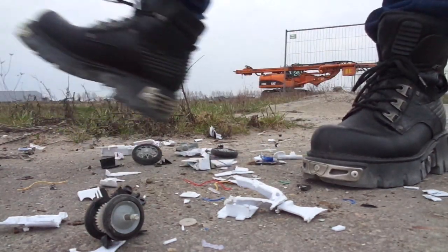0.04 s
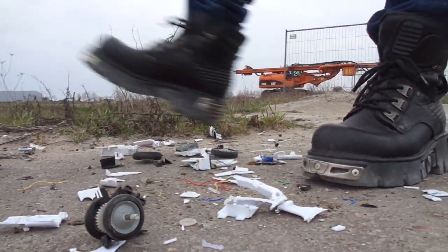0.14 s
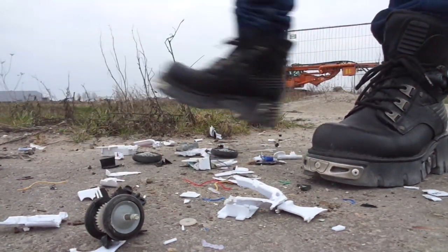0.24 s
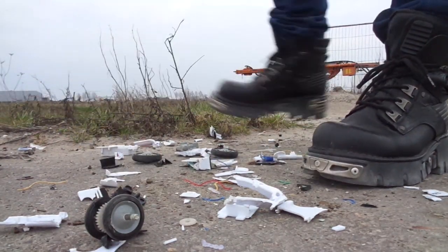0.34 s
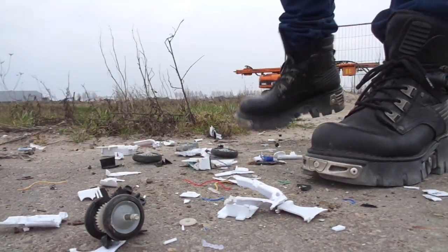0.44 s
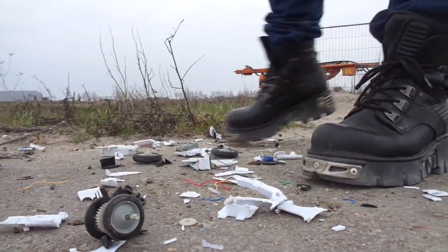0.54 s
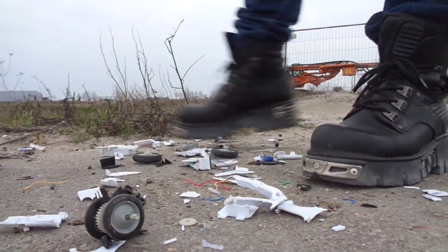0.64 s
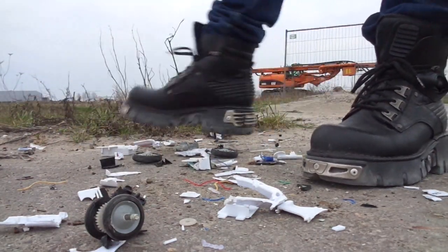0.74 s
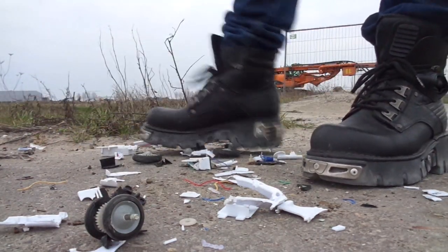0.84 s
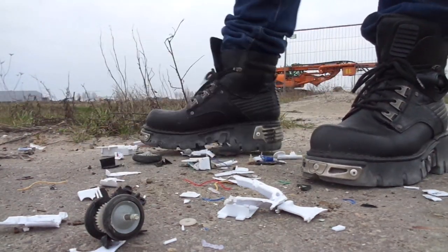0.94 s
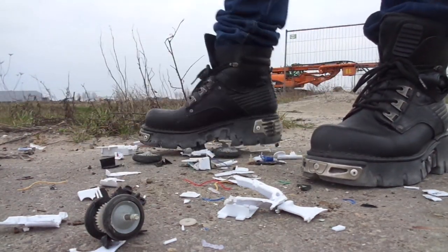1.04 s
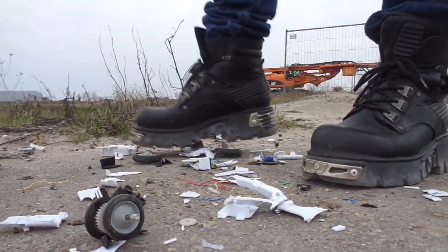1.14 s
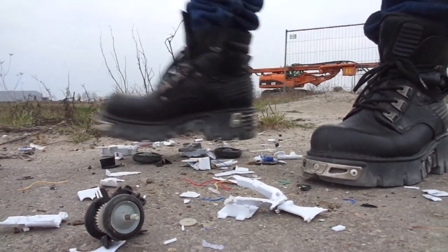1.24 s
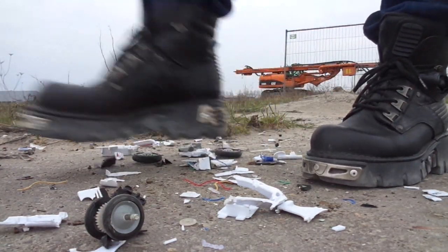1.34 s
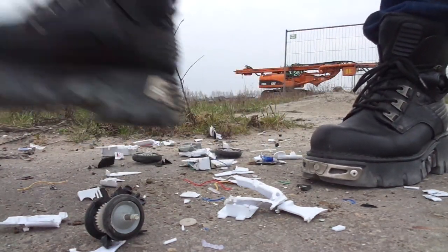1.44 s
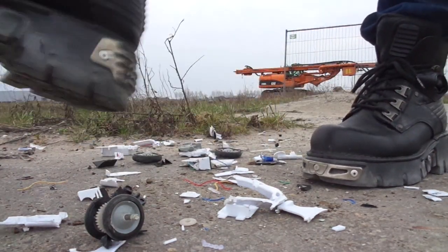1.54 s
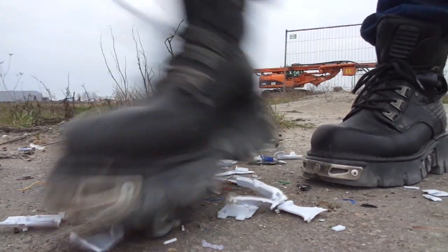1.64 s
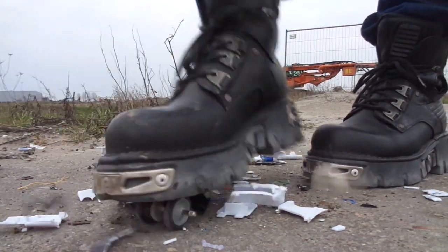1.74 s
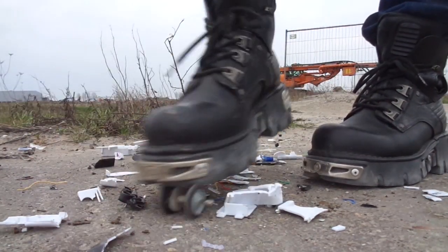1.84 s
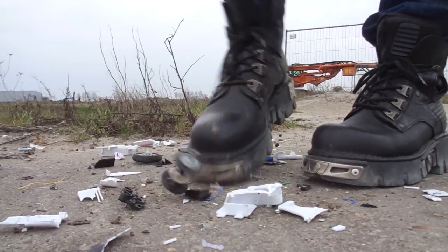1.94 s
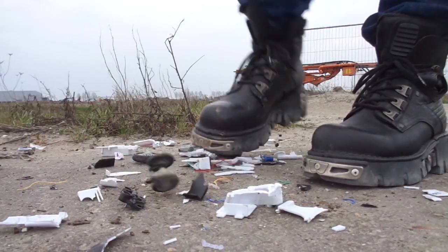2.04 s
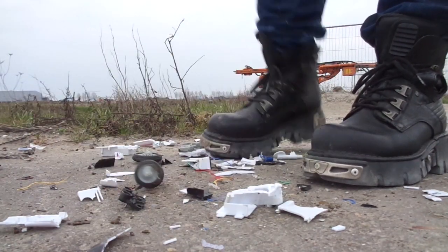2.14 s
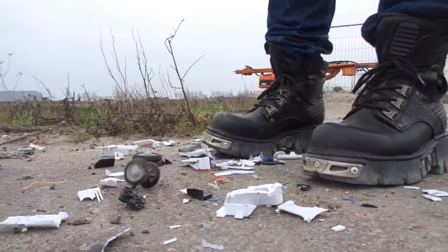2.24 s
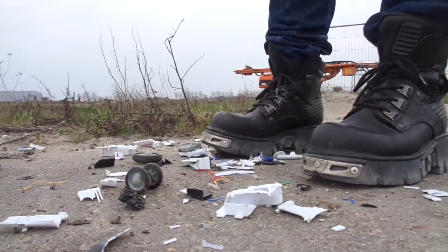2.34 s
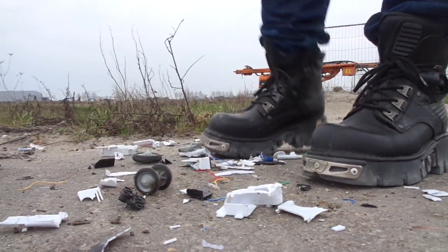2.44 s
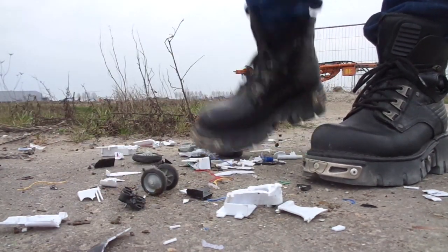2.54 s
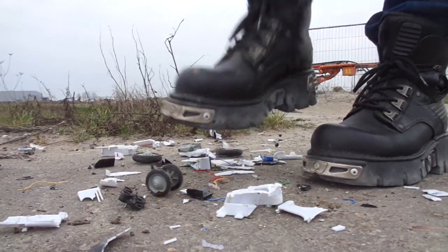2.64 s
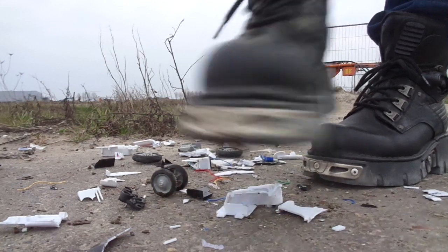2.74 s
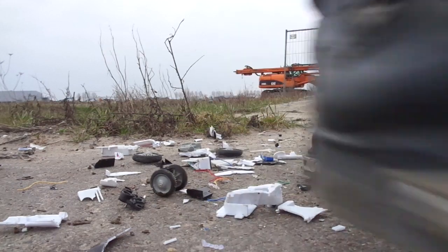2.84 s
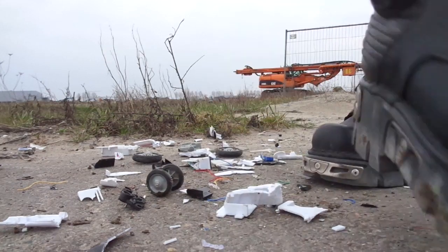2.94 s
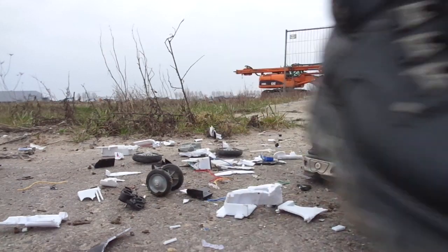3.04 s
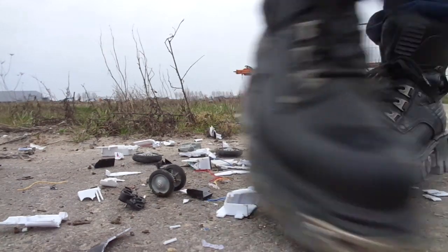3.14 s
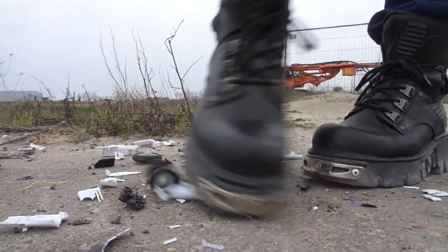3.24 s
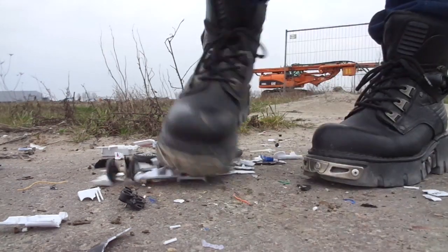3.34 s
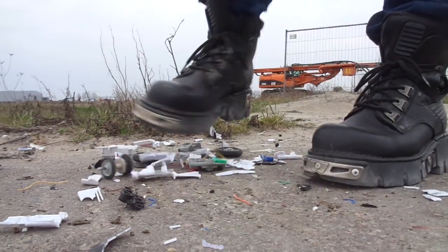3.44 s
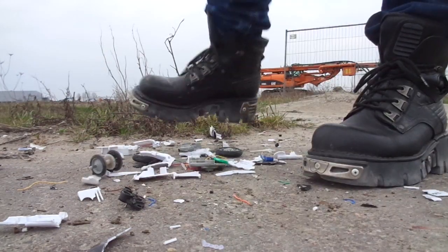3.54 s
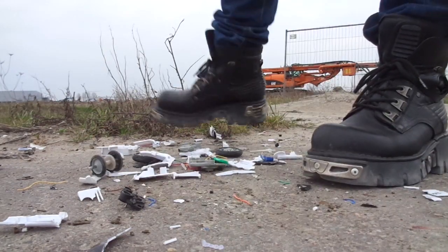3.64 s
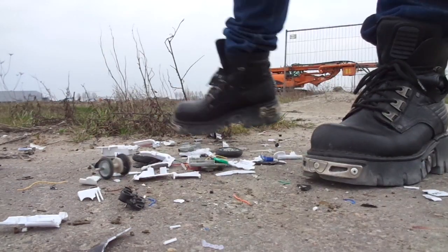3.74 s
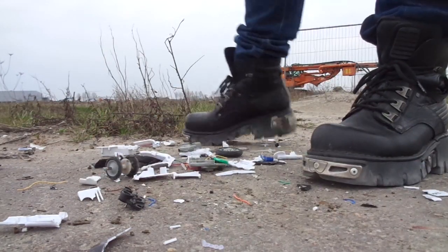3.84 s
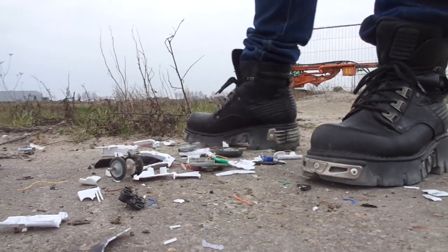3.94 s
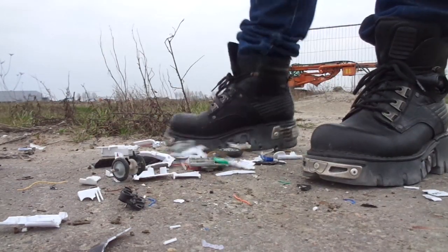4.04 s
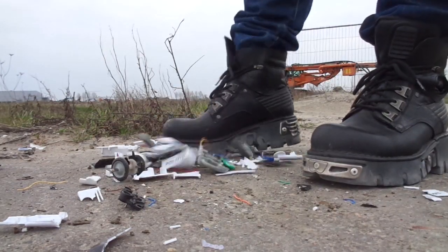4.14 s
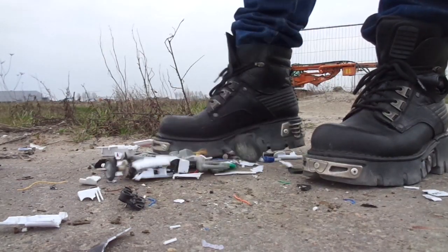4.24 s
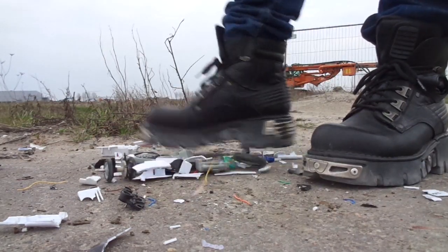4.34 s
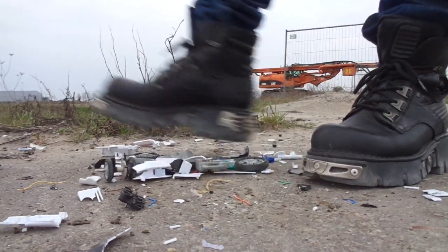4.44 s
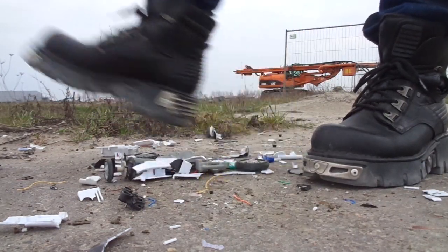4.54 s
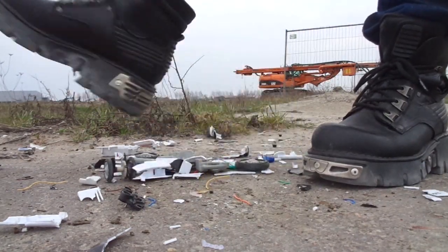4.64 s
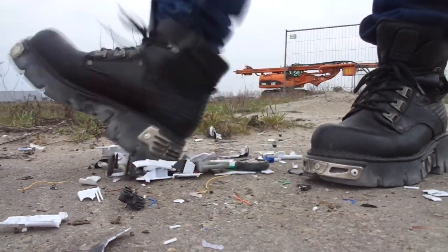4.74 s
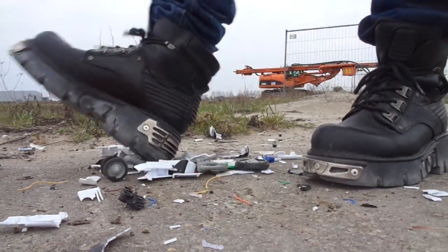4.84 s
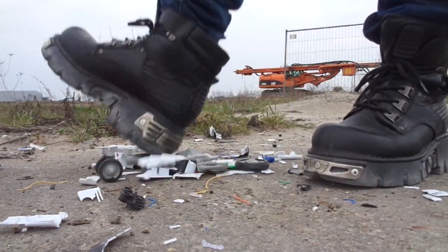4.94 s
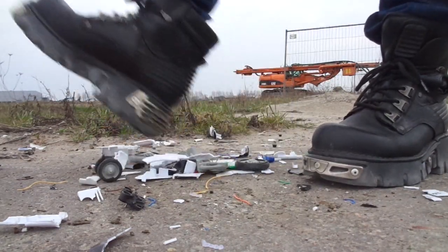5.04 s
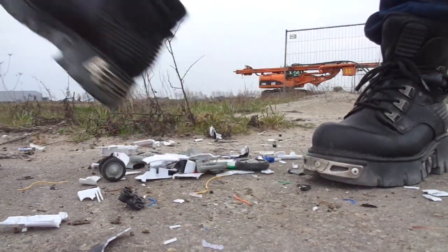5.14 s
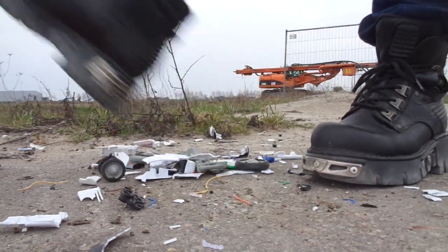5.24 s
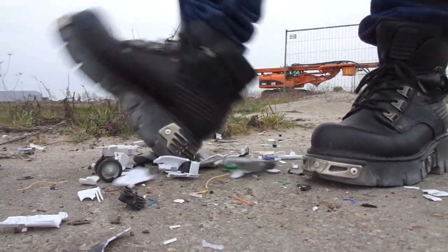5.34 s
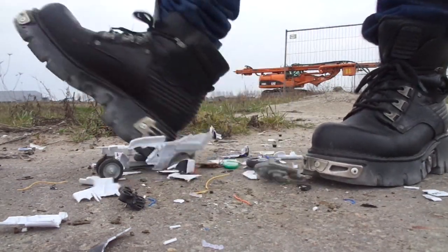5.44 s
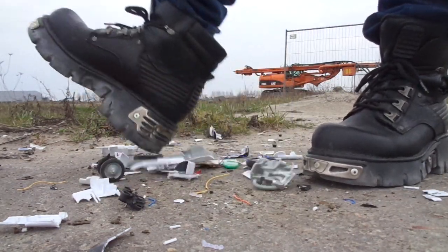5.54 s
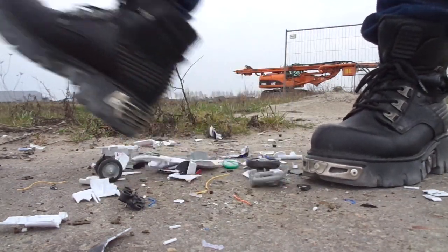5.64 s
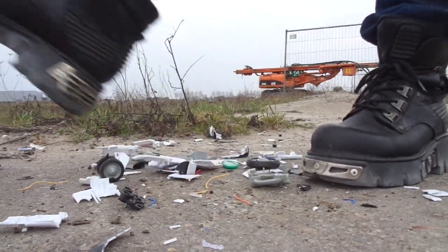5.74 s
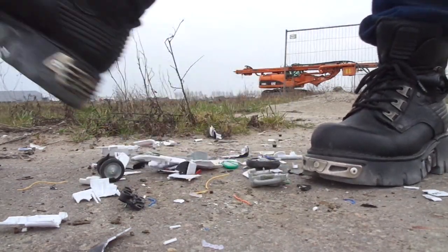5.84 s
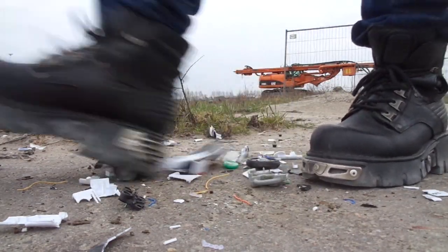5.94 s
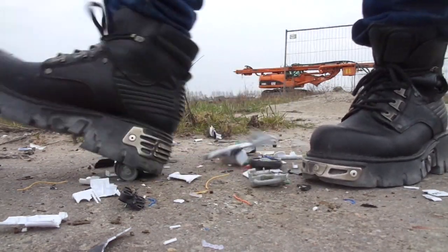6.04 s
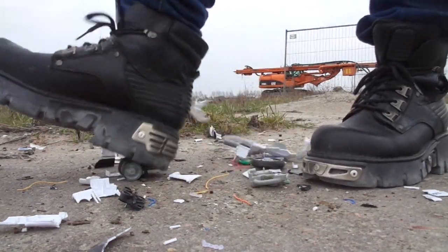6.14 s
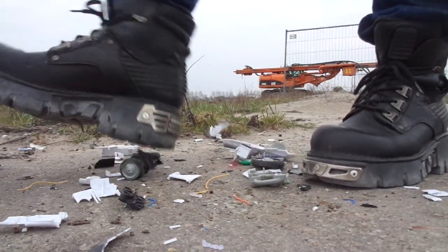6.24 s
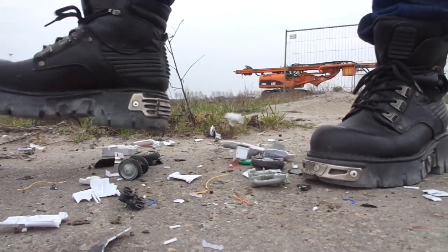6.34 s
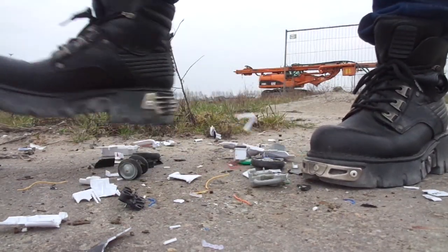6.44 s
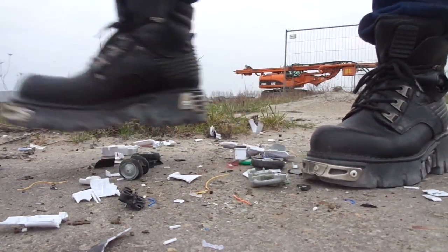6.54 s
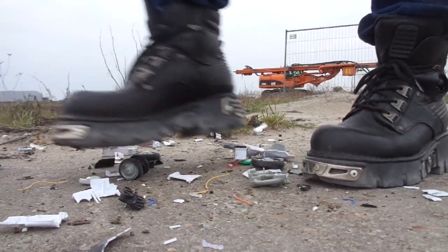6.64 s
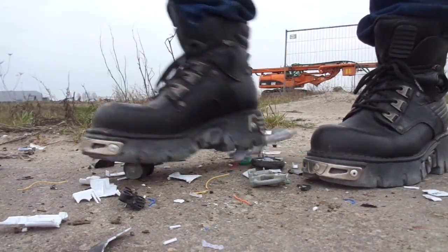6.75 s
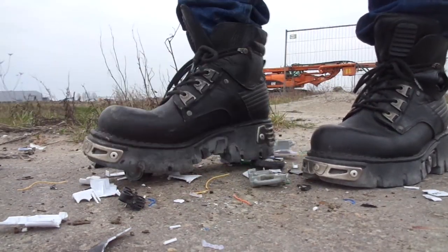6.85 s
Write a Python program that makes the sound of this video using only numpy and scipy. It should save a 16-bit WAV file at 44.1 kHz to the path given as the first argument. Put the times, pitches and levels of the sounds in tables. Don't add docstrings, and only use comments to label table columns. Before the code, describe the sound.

A heavy boot stamps brittle plastic on gritty pavement: sharp overloaded cracks, clattering shards and scraping drags, while a distant machine's roar recedes.

```python
import sys
import numpy as np
from scipy import signal
from scipy.fft import rfft, irfft
from scipy.io import wavfile
from scipy.ndimage import uniform_filter1d

SR = 44100
rng = np.random.default_rng(int(sys.argv[2]) if len(sys.argv) > 2 else 0)


def undo_db(level):
    steps = np.asarray(level, float) / 20
    return 10 ** steps


def output_pcm(signal):
    pcm = np.clip(np.atleast_2d(signal).T, -1, 1) * 32767
    wavfile.write(sys.argv[1], SR, np.round(pcm).astype(np.int16))


N = 303849

# (time [s], roar level [dB], whine level [dB])
MACHINE = [(0, -28.5, -65), (.2, -39, -45), (.5, -30, -52), (.65, -30.5, -45), (.8, -31, -39.5),
           (.95, -41, -44.5), (1.22, -30.5, -52), (1.35, -31, -49), (1.5, -45, -40.5), (1.62, -43, -41.5),
           (2.05, -47.5, -46), (2.9, -52, -45), (3.62, -54.5, -50.5), (3.8, -51.5, -45), (4.5, -55, -58.5),
           (5.2, -62, -61), (6.5, -64, -61.5), (6.89, -49, -67)]
# (frequency [Hz], density [dB per Hz])
ROAR_SPECTRUM = [(150, -45), (270, -20.5), (570, -2.5), (900, 2), (1400, -7), (2100, -11.5), (2900, -32.5),
                 (5000, -67.5)]
# (multiple of its pitch, width [Hz], level [dB])
WHINE_PARTIALS = [(1, 40, -15.5), (2, 150, -8.5), (3, 85, -2.5)]
# (frequency [Hz], density [dB per Hz])
WIND_SPECTRUM = [(15, -21), (30, -10.5), (55, 3.5), (110, -3.5), (200, -15.5), (400, -39.5)]
# (peak time [s], level [dB])
GUSTS = [(.45, -59), (.8, -56.5), (1.4, -53.5), (1.8, -43.5), (2.6, -59), (3.051, -59), (3.6, -57.5),
         (4.05, -53.5), (4.8, -53), (5.2, -55.5), (6.001, -60), (6.8, -56)]
# (frequency [Hz], density [dB per Hz])
HISS_SPECTRUM = [(150, 8), (400, 15), (1100, 18.5), (2200, 11.5), (2900, 3), (6000, -3), (14000, -4),
                 (16000, -11)]
# (time [s], peak level [dB], frequency [Hz], t60 [s])
THUDS = [(0.783, -29.5, 124, 0.1), (0.85, -15, 513, 0.05), (1.659, -10.5, 275, 0.045),
         (1.763, -37, 169, 0.053), (1.785, -25.5, 136, 0.084), (1.907, -27, 160, 0.05),
         (2.139, -34.5, 256, 0.04), (3.973, -36, 369, 0.04), (4.765, -15, 219, 0.029),
         (5.338, -21, 439, 0.057), (5.44, -51.5, 410, 0.087), (5.964, -8.5, 317, 0.02),
         (6.728, -24, 399, 0.03)]
# (time [s], level [dB])
SHELL = [(3.02, -63), (3.05, -23), (3.12, -29.5), (3.16, -43), (3.27, -38.5), (3.34, -66)]
# (frequency [Hz], width [Hz], level [dB])
PIECE_RINGS = [(1320, 280, 3), (2920, 280, 9.5), (4900, 460, 8.5), (6300, 280, 3.5)]
# (time [s], level [dB])
PIECE_HELD = [(3.125, -25), (3.165, -31), (3.21, -21.5), (3.29, -22), (3.33, -35.5), (3.365, -20.5),
              (3.39, -39), (3.44, -42), (3.52, -45)]
# (time [s], peak
# level [dB], ring [Hz], t60 [ms])
KNOCKS = [(3.023, -12, 4900, 12), (3.0506, -2.5, 2510, 18), (3.0564, -15, 2620, 12), (3.0638, -6, 2560, 13),
          (3.0689, -0.5, 2700, 9.8), (3.0914, -9, 2770, 12), (3.0974, -5, 2400, 8.9),
          (3.1034, -4.5, 2370, 9), (3.1204, -14, 4970, 18), (3.141, -10, 5440, 36), (3.1697, -10, 4880, 38),
          (3.1838, -14, 2900, 15), (3.21, -10, 3020, 18), (3.2323, -23, 2930, 19), (3.2484, -18, 5200, 18),
          (3.265, -10, 6260, 20), (3.276, -7, 5770, 23), (3.3, -21, 2920, 21), (3.36, -10, 4660, 40),
          (3.367, -10, 2920, 17), (3.403, -19, 4800, 43), (3.425, -17, 4480, 47), (3.462, -24, 7300, 20),
          (3.504, -22, 6800, 29), (4.066, -13.5, 3630, 23), (4.0896, -18, 2600, 24), (4.128, -16, 2540, 28),
          (4.1654, -19, 3320, 18), (4.197, -17, 3390, 31), (4.2073, -18, 1390, 36), (4.222, -20, 1380, 82),
          (4.236, -21, 3070, 12), (4.2493, -16, 5050, 12), (4.275, -18, 2190, 9.1), (4.297, -25, 2710, 12),
          (4.36, -31, 7000, 12), (4.4144, -30.5, 1210, 18), (6.017, -20, 2850, 19), (6.0557, -19, 3770, 18),
          (6.0744, -26, 5250, 18), (6.146, -30, 2220, 20), (6.2, -24, 1180, 18), (6.2174, -27, 7430, 35),
          (6.281, -30, 7460, 8), (2.1417, -27, 1500, 7), (4.887, -22, 3030, 14), (5.361, -41.5, 7700, 15),
          (5.374, -30, 1200, 110), (5.4105, -16, 6380, 22), (5.4205, -22, 4800, 14), (5.47, -19, 1300, 25),
           (5.535, -25, 2950, 110), (5.5562, -26, 1370, 80), (5.559, -27, 5300, 50), (5.566, -25, 3750, 50),
           (5.579, -20, 5000, 15), (5.606, -25, 4900, 70), (5.6484, -30, 4450, 8), (5.6595, -25, 3970, 25),
           (5.672, -26, 3700, 50), (5.696, -34, 4500, 25), (5.722, -36, 4200, 25), (6.036, -25, 2100, 90),
           (6.258, -34, 2800, 90), (6.761, -17, 1700, 18), (6.771, -24, 6300, 8), (6.783, -20, 2050, 70),
           (6.785, -19, 4700, 35), (6.802, -20, 4400, 40), (6.802, -23, 2050, 30), (6.822, -28, 2050, 100),
           (6.837, -23, 3850, 45), (4.763, -6, 6700, 18), (.05, -31, 6500, 20), (.084, -31, 3900, 40),
           (.131, -19, 7500, 14), (.134, -25, 3200, 12), (.214, -33, 3200, 10), (.288, -34, 3800, 12),
           (1.68, -5, 1000, 12), (1.712, -22, 7000, 8), (1.7022, 2, 1300, 4), (5.988, -11, 1050, 8),
           (2.1688, -5, 1550, 2), (5.535, -25, 3260, 100), (1.9215, -21, 10300, 5)]
# (time [s], peak level [dB], ring [Hz])
GRAINS = [(0.9194, -33, 2910), (0.9777, -35, 3360), (1.1258, -44, 4440), (1.152, -33, 2790),
          (1.191, -35, 3130), (1.2414, -35, 3050), (0.34, -38, 3330), (1.457, -30.5, 6300),
          (6.725, -34, 4500), (1.922, -24, 6460), (1.7744, -26, 4150), (1.822, -39, 3780),
          (1.8654, -36, 7060), (1.8927, -30, 9000), (2.0294, -33, 4230), (2.0981, -31, 3930),
          (2.1224, -26, 3030), (2.156, -21, 1900), (2.225, -47, 3570), (2.3176, -34, 2950),
          (2.601, -38, 3460), (3.8794, -41.5, 3120), (2.136, -30, 6800), (4.3894, -31, 6110),
          (4.4894, -36, 4560), (4.8569, -29, 2910), (4.9094, -37, 5040), (5.039, -28, 3880),
          (6.3864, -33, 7200)]
# (time [s], level [dB], mid share [dB])
DRAGS = [
    [(3.01, -32, -5), (3.05, -26.5, -2), (3.1, -22, -3.5), (3.162, -31, -8), (3.2, -34, 6),
     (3.28, -18.5, -8.5), (3.335, -25, -17), (3.365, -27.5, -8), (3.39, -48, -14)],
    [(4.06, -24.5, -1.5), (4.1, -32, -10.5), (4.2, -25, -10.5), (4.28, -30.5, -18), (4.36, -41, -18),
     (4.45, -61, 11)],
]
# (peak time [s], level [dB], rise [dB/s], fall [dB/s], mid share [dB])
SPRAYS = [(.125, -43, 120, 300, 1), (0.868, -48.5, 1997, 387, 20), (1.2, -59.5, 47, 150.5, 14),
          (1.669, -26.5, 1990, 347, 4.5), (1.722, -32, 148, 1500, -4.5), (1.85, -59.5, 97, 38.5, 19),
          (2.15, -61.5, 78, 198, 1), (3.43, -31.5, 198, 178, -4), (3.981, -54, 248, 251.5, 11),
          (4.786, -44.5, 1999.5, 654.5, 7.5), (4.87, -38.5, 167.5, 192.5, -4.5), (5.05, -51, 60, 400, 3),
          (5.35, -51.5, 2000.5, 236, 4.5), (5.451, -26, 434.5, 349.5, -4.5), (5.59, -37, 65, 148, -9.5),
          (5.719, -52, 67, 606.5, -7.5), (5.989, -35, 2003.5, 334, -1), (6.045, -28.5, 67.5, 250, -10),
          (6.14, -43.5, 78, 165, -5), (6.27, -51.5, 48, 74, 3), (6.77, -52, 664.5, 191, 13),
          (6.82, -27, 214, 364, -29)]
# (time [s], five rings [Hz])
SHARDS = [
    (0, 2620, 3100, 3680, 5140, 6560),
    (1.6, 940, 2650, 3680, 5360, 6860),
    (3.0, 2510, 2720, 2750, 4620, 5000),
    (3.12, 2770, 3280, 4540, 5030, 6280),
    (3.9, 1280, 2710, 3340, 4100, 4880),
    (4.7, 1930, 2520, 2940, 4600, 6840),
    (5.3, 1160, 3020, 3870, 4830, 4810),
    (5.9, 1990, 2800, 3140, 3890, 5460),
    (6.6, 1550, 2070, 3840, 4200, 5260),
]
# (frequency [Hz], density [dB per Hz])
PLASTIC_SPECTRUM = [(800, -44.5), (1600, 2), (2600, -0.5), (4500, -5), (6800, -1.5), (9000, -9.5),
                    (13000, -18.5), (16000, -13.5)]
# (time [s], peak level [dB], shard ring [Hz], tearing time [ms], body minus peak [dB])
STAMPS = [(0.8536, 5, 2490, 2.2, -7), (0.8589, -2, 2820, 3.6, -7), (0.878, -22, 6500, 4.5, 5),
          (1.6636, 1, 7230, 1.44, -10), (1.6611, -10.5, 2280, 6.4, 0), (1.674, -25, 1880, 0.97, 20),
          (1.6853, -8.5, 8300, 0.98, -2), (1.7018, -4.5, 2600, 0.6, -3.5), (2.143, -30, 1940, 14, 6),
          (3.972, -42, 2930, 19, 17), (4.7612, 0.5, 3000, 4.1, -11.5), (4.77, 5, 5960, 2.1, -24.5),
          (4.774, -6, 3500, 1.8, -11.5), (4.7822, -10.5, 6000, 1.7, -6), (5.33, 5, 2520, 1.9, -10.5),
          (5.334, 5, 3430, 8.3, -12), (5.475, -21, 3530, 3.2, -0.5), (5.9514, 3, 6700, 0.38, -18),
          (5.96, -13.5, 7500, 1.5, -3), (5.9661, -5, 3580, 8.9, -4.5), (5.9799, -3.5, 4260, 4.2, -37),
          (5.9853, -9, 4970, 11.3, -5.5), (6.7516, -22, 4030, 3, -4.5), (6.7823, -11.5, 4500, 3.4, -14),
          (6.801, -19.5, 6800, 1.8, -4.5), (6.81, -27, 6550, 7.8, -13)]
# (time [s], peak level [dB], shard ring [Hz], tearing time [ms])
SNAPS = [(3.0032, -15, 2820, 2.2), (3.026, -17.5, 2920, 2.2), (3.0331, -18, 5960, 1.4),
         (3.039, -6.5, 2830, 5), (3.0685, -15.5, 2580, 2.3), (3.0806, -8.5, 2430, 3.1),
         (3.104, -14, 2430, 2.5), (3.1286, -9.5, 4700, 0.66), (3.14, -19, 4930, 3.9),
         (3.1695, -29, 4900, 1.6), (3.189, -7.5, 4310, 3.9), (3.211, -25, 2840, 1.2),
         (3.309, -10, 3370, 6.8), (3.344, -4.5, 3640, 0.57), (3.357, -23, 4700, 0.61),
         (3.3786, -32, 3440, 1.5), (3.4018, -16, 4460, 3.6), (3.4253, -25, 4460, 6.6),
         (3.493, -29, 6150, 1.9), (3.537, -32, 7700, 2.1), (4.056, -17.5, 3060, 12.6),
         (4.075, -17.5, 5600, 1.5), (4.112, -17.5, 4140, 3.2), (4.117, -9, 4300, 1.3),
         (4.122, -20, 2630, 9.8), (4.148, -19, 3650, 1.7), (4.1703, -21.5, 3800, 6.2),
         (4.252, -22, 2730, 10), (4.2665, -22, 4600, 10), (4.3166, -28.5, 4700, 1), (4.3288, -30, 2920, 1)]
# (time [s], peak level [dB], shard ring [Hz], skid [ms])
LANDINGS = [(4.823, -29, 2780, 1.4), (4.884, -31, 3020, 2.2), (4.953, -30.5, 6160, 6.3),
            (4.968, -25, 2750, 0.81), (5.053, -32, 3680, 5.2), (5.43, -16, 4180, 0.92),
            (5.438, -9.5, 4100, 1.7), (5.4481, -10, 3500, 3), (5.533, -22, 5000, 2.6),
            (5.5839, -18.5, 3850, 5.8), (5.6052, -30, 4730, 2), (5.623, -22, 3000, 2.5),
            (5.669, -25.5, 4740, 2.1), (6.02, -19.5, 2820, 3.8), (6.036, -19, 4040, 2.3),
            (6.067, -27, 3180, 8.7), (6.102, -22, 3280, 5.2), (6.1262, -19.5, 3020, 0.64),
            (6.1376, -23.5, 2560, 4.7), (6.1803, -29, 3950, 19), (6.2148, -36.5, 9800, 4),
            (6.257, -30, 7440, 5), (6.309, -32, 4070, 1.4), (6.354, -32, 6370, 4),
            (6.535, -38.5, 5240, 2.4), (6.8354, -30, 3700, 3.5), (6.8574, -25, 3280, 6.6),
            (6.8885, -20, 3990, 1.2)]
# (time [s], peak level [dB], ring [Hz])
TICKS = [(0.057, -29.5, 3630), (0.091, -34.5, 6300), (0.1006, -24.5, 2800), (0.1252, -18, 5400),
         (0.201, -29.5, 3460), (0.2436, -34, 3340), (0.85, -12, 1470), (1.08, -37.5, 9600),
         (1.1628, -28, 2730), (1.215, -27.5, 2650), (1.504, -40.5, 6000), (0.004, -40, 3500),
         (1.789, -33, 4370), (1.8, -36, 2710), (1.841, -27, 4300), (1.883, -32, 4050), (1.902, -28.5, 8800),
         (1.915, -29, 8500), (1.731, -32, 4600), (1.956, -21.5, 3350), (1.9683, -26, 2730),
         (1.9926, -32.5, 6700), (2.05, -33, 10000), (2.352, -36, 2900), (2.531, -39, 4220),
         (2.5832, -35.5, 2550), (6.554, -36.5, 4890)]

WHINE_HZ = 677
GUST_RISE_DB_S, GUST_FALL_DB_S, CALM_DB, CALMING_DB_S = 65, 65.5, -57.5, 2
HISS_DB = -49.5
GRAIN_T60_MS, GRAIN_DB, KNOCK_DB = 13, -3.5, -7
TICK_MS = 1
SNAP_BODY_DB, LANDING_BODY_DB, TICK_BODY_DB, BODY_DB_PER_OCTAVE = -12, -13.5, -8, -2.5
TOP_HZ = 15050


def unit(x):
    return x / np.sqrt(np.mean(x ** 2))


def noise():
    return rng.standard_normal(N)


def colour(x, points):
    hz, db = np.transpose(points)
    bins_hz = np.arange(1, 2050) * SR / 4096
    cepstrum = irfft(np.log(undo_db(np.interp(np.log(bins_hz), np.log(hz), db))))
    cepstrum[1:2048] *= 2
    cepstrum[2049:] = 0
    response = irfft(np.exp(rfft(cepstrum)))[:2048]
    return signal.fftconvolve(x, response)[:len(x)]


def ring(x, hz, width_hz):
    b, a = signal.iirpeak(np.clip(hz, 40, .45 * SR), max(hz / width_hz, .3), SR)
    return signal.lfilter(b, a, x)


def walk(rate):
    hold = int(SR / rate)
    steps = np.repeat(rng.standard_normal(int(N / 20)), hold)[:N]
    return unit(uniform_filter1d(uniform_filter1d(steps, hold), hold))


def breaks(chance, share, spread_db):
    size = undo_db(-spread_db * np.log(chance[2] + 1e-9))
    return (chance[0] < share) * np.sign(chance[1] - .5) * size


def add(out, s, x):
    i = int(s * SR)
    out[i:i + len(x)] += x[:N - i]


def curve(rows, rise_s=0.0068, fall_s=0.018):
    t = np.arange(N) / SR
    s, *columns = np.transpose(rows)
    inside = np.clip(np.minimum((t - s[0]) / rise_s + 1, (s[-1] - t) / fall_s + 1), 0, 1)
    return [inside * undo_db(np.interp(t, s, db)) for db in columns]


def swell(s, db, rise_db_s, fall_db_s):
    t = np.arange(N) / SR - s
    slope = np.where(t < 0, -abs(rise_db_s), abs(fall_db_s))
    return undo_db(db - slope * t)


def hiss():
    return undo_db(HISS_DB) * unit(colour(noise(), HISS_SPECTRUM))


def wind():
    gusts = swell(0, CALM_DB, 0, CALMING_DB_S)
    for s, db in GUSTS:
        gusts = gusts + swell(s, db, GUST_RISE_DB_S, GUST_FALL_DB_S)
    rumble = unit(colour(noise(), WIND_SPECTRUM)) * undo_db(4.5 * walk(25)) * gusts
    return rumble + undo_db(-69.5) * unit(ring(noise(), 120, 9.7))


def machine():
    roar_gain, whine_gain = curve(MACHINE)
    humps = sum(undo_db(3 * walk(14)) * ring(noise(), hz, 0.27 * hz) for hz in (620, 850, 1100))
    roar = unit(colour(noise() + undo_db(-3.5) * humps, ROAR_SPECTRUM))

    hz = WHINE_HZ * (1 - .014 * np.arange(N) / SR + 0.0088 * walk(7))
    phase = 2 * np.pi * np.cumsum(hz) / SR
    whine = 0
    for k, width_hz, db in WHINE_PARTIALS:
        b, a = signal.butter(2, width_hz, fs=SR)
        in_phase, quadrature = (unit(signal.lfilter(b, a, noise())) for _ in range(2))
        partial = in_phase * np.cos(k * phase) + quadrature * np.sin(k * phase)
        whine = whine + undo_db(db + 1.6 * walk(9) + 2.5 * walk(20)) * partial
    return roar_gain * roar + undo_db(2.0) * whine_gain * whine


def thuds():
    out, t = np.zeros(N), np.arange(8000) / SR
    for s, db, hz, t60 in THUDS:
        wobble = 1 + .5 * unit(ring(rng.standard_normal(len(t)), 100, 81))
        envelope = np.minimum(t / 0.0041, 1) * 1000 ** (-t / max(t60, .01))
        add(out, s, undo_db(db) * wobble * np.sin(2 * np.pi * hz * t) * envelope)
    return out


def scraped_shell():
    rub = noise()
    low = ring(rub, 286, 89) + undo_db(-34) * ring(rub, 570, 310)
    return curve(SHELL)[0] * unit(ring(low, 590, 710))


def dragged_piece():
    slips = breaks(rng.random((3, N)), 0.023, 1.0) * undo_db(2.3 * walk(90))
    rings = sum(undo_db(db) * unit(ring(slips, hz, width_hz)) for hz, width_hz, db in PIECE_RINGS)
    return curve(PIECE_HELD)[0] * unit(rings)


def knocks():
    out, t_ms = np.zeros(N), np.arange(2500) / SR * 1000
    grains = [(s, db + GRAIN_DB, hz, GRAIN_T60_MS) for s, db, hz in GRAINS]
    for s, db, hz, t60_ms in KNOCKS + grains:
        rough = np.sin(2 * np.pi * hz * t_ms / 1000) + rng.standard_normal(len(t_ms))
        push = rough * t_ms * np.exp(-t_ms / 0.37)
        width_hz = np.log(1000) / np.pi / max(t60_ms, 2) * 1000
        x = unit(ring(push, hz, width_hz))
        x = x + undo_db(-17.5) * unit(ring(push, 1.4 * hz, 1.0 * width_hz))
        x = x + undo_db(-21.5) * unit(ring(push, hz, 1.3 * hz))
        add(out, s - .001, undo_db(db + KNOCK_DB) * x / np.abs(x).max())
    return out


def patchy(x, spread_db):
    bands = 0
    for k, hz in enumerate((1500, 2500, 4000, 6300, 9500, 13500)):
        bands = bands + (-1) ** k * undo_db(spread_db * walk(70)) * ring(x, hz, .55 * hz)
    return unit(bands)


def thrown_at(s):
    blows = [row[0] for row in STAMPS if row[1] > -7 and row[0] <= s]
    return np.arange(N) / SR >= max([0] + blows)


def loose_shards(x, width_hz, scatter, spread_db):
    out, step = np.zeros(N), SR // 45
    for a in range(0, N, step):
        rings = [row[1:] for row in SHARDS if row[0] * SR <= a + step][-1]
        for v, hz, (bend, grip) in zip(x, rings, rng.standard_normal((5, 2))):
            clicks = np.pad(v[a:a + step], (0, step))
            add(out, a / SR, undo_db(spread_db * grip) * ring(clicks, hz * (1 + scatter * bend), width_hz))
    return out


def grit(pushes):
    dragged, mid, sprayed = 0, 0, 0
    for drag in DRAGS:
        level, share = curve(drag)
        dragged, mid = dragged + level, mid + level * share
    for *spray, share_db in SPRAYS:
        level = swell(*spray) * thrown_at(spray[0])
        sprayed, mid = sprayed + level, mid + level * undo_db(share_db)

    clicks = breaks(rng.random((3, N)), .12, 2.2) * undo_db(3.0 * walk(200) + 3 * walk(70))
    bright = colour(clicks, PLASTIC_SPECTRUM)
    out = undo_db(-5) * (dragged * patchy(bright, 4.5) + sprayed * patchy(ring(bright, 4200, 5000), 5))
    out += mid * unit(ring(clicks, 1500, 1200) + ring(clicks, 710, 1200))

    pressure = undo_db(7) * (dragged + undo_db(3) * sprayed)
    own = []
    for _ in range(5):
        own_clicks = unit(breaks(rng.random((3, N)), .008, 2.4))
        own.append(pressure * own_clicks + undo_db(-4) * pushes)
    return out + undo_db(-4) * loose_shards(own, 130, .025, 3)


def fractures():
    def body(db, hz):
        return db + BODY_DB_PER_OCTAVE * np.log2(hz / 3500)

    snaps = [(*row, body(SNAP_BODY_DB, row[2])) for row in SNAPS]
    landings = [(*row, body(LANDING_BODY_DB, row[2])) for row in LANDINGS]
    ticks = [(*row, TICK_MS, body(TICK_BODY_DB, row[2])) for row in TICKS]
    return STAMPS + snaps + landings + ticks


def to_peak(x):
    return x / np.sqrt(uniform_filter1d(x ** 2, size=88).max())


def cracks():
    out, pushes, t_ms = np.zeros(N), np.zeros(N), np.arange(3000) / SR * 1000
    for s, db, hz, tear_ms, body_db in fractures():
        chance, pick = rng.random((3, len(t_ms))), rng.random(4)
        after = np.maximum(t_ms - 1.1 * tear_ms, 0)
        rattle = undo_db(min(-11, -28 - .7 * db)) * np.exp(-after / 8)
        envelope = np.minimum(t_ms / (0.056 + 0.12 * tear_ms), 1) * (np.exp(-after / 1.84) + rattle)
        push = envelope * breaks(chance, 0.49, 3.32)
        push[8:12] += undo_db(20) / (1 + tear_ms) * np.array([.6, 1, -.8, -.5])

        shard = undo_db(5.5) * ring(push, hz, 0.21 * hz)
        shard += undo_db(min(8, -1 - .4 * db)) * ring(push, hz * (.97 + .06 * pick[0]), 60)
        bright = ring(colour(push, PLASTIC_SPECTRUM), hz, 2.2 * hz)
        if db <= -15 and hz <= 5200:
            bright = ring(bright, hz, 2.3 * hz)
        shard += bright
        body = ring(ring(push, 700 + 700 * pick[2], 570), 390, 1600)
        add(out, s, undo_db(db - 5.0) * (to_peak(shard) + undo_db(body_db) * to_peak(body)))
        add(pushes, s, undo_db(min(db, -9)) * ring(to_peak(push), hz, 1.3 * hz))
    return out, pushes


def scene():
    background = machine() + wind() + hiss()
    breaking, pushes = cracks()
    near = thuds() + scraped_shell() + dragged_piece() + knocks() + grit(pushes) + breaking
    tail = rng.standard_normal(4000) * 1000 ** (-np.arange(4000) / SR / .05)
    near = near + undo_db(-42) * signal.fftconvolve(near, tail)[:N]
    mid = near + background
    side_spectrum = [(100, -11.5), (1000, -18.5), (4000, -16.0), (12000, -3.5)]
    side = undo_db(-18.5) * colour(np.roll(mid, 40), side_spectrum)
    return np.array([mid + side, mid - side])


def roll_off(x):
    return signal.sosfilt(signal.butter(12, 16050, fs=SR, output="sos"), x)


def record(dry):
    clipped = np.clip(dry, -.93, .93)
    lowpass = signal.ellip(10, .2, 70, TOP_HZ, fs=SR, output="sos")
    mix = signal.sosfilt(lowpass, clipped)
    return roll_off(mix)


dry = scene()
out = record(dry)
output_pcm(out)
```